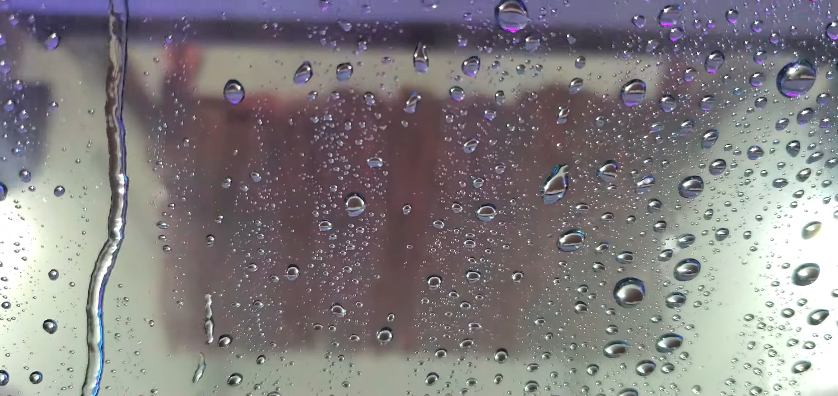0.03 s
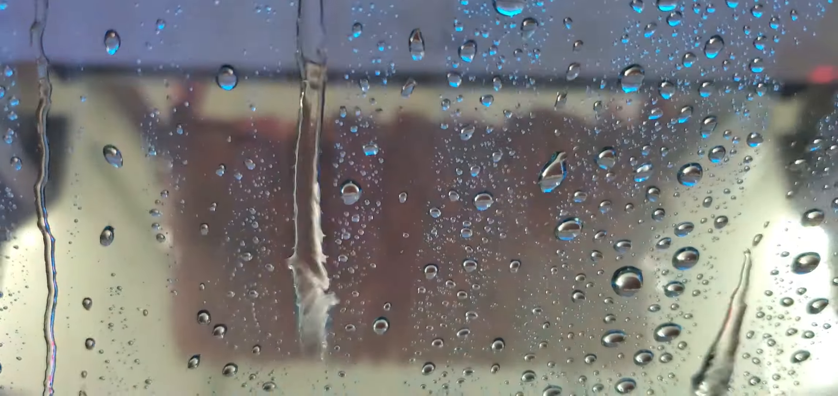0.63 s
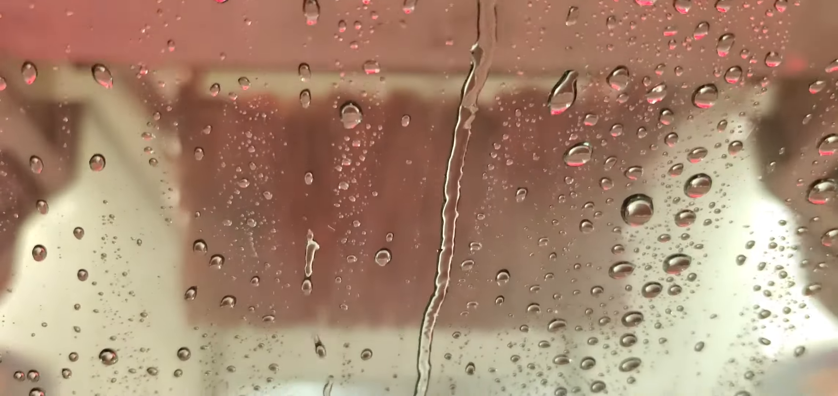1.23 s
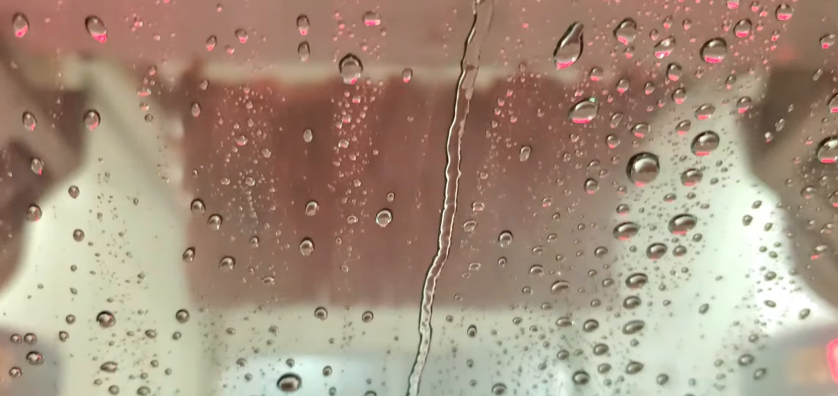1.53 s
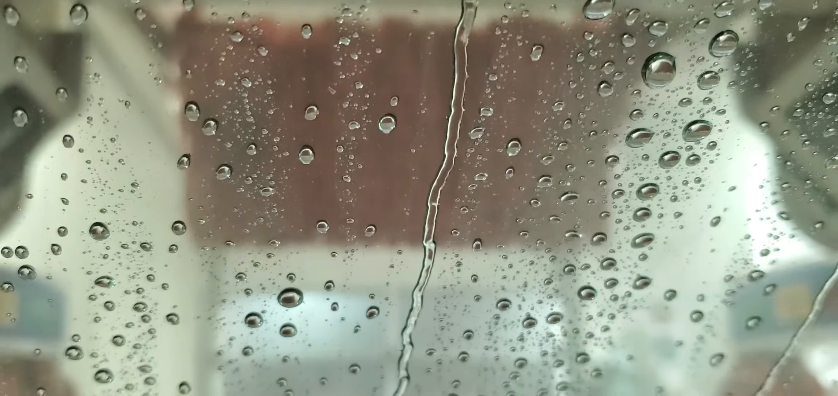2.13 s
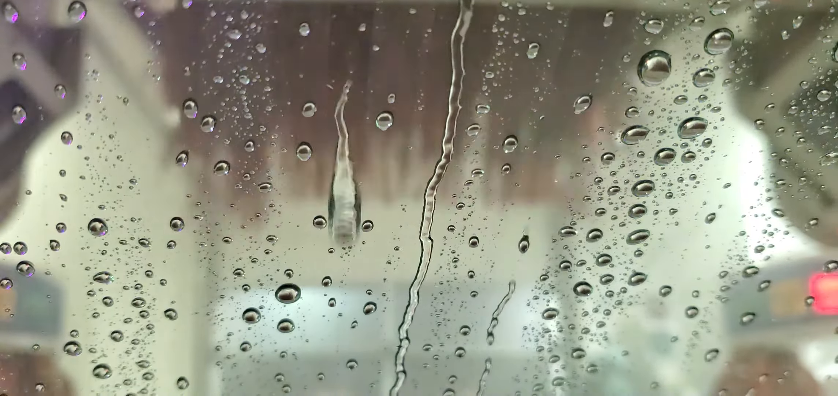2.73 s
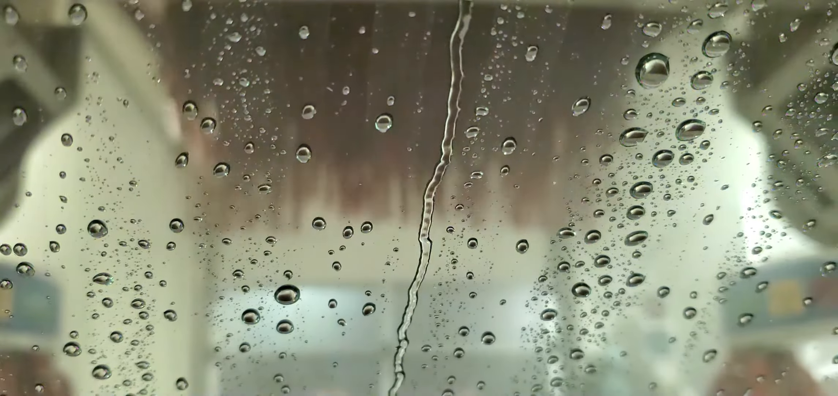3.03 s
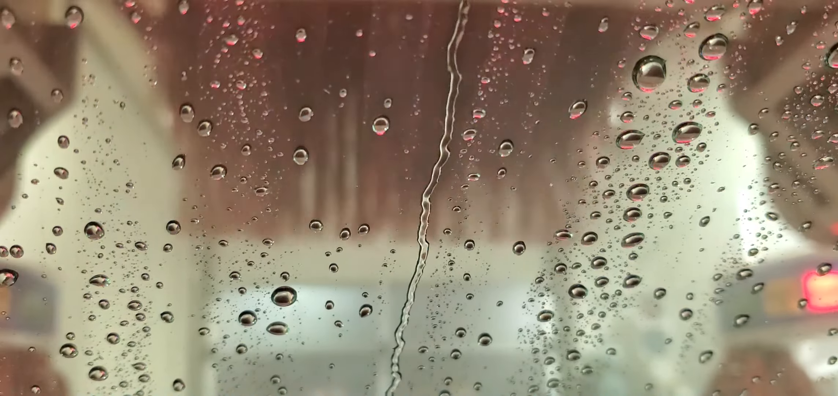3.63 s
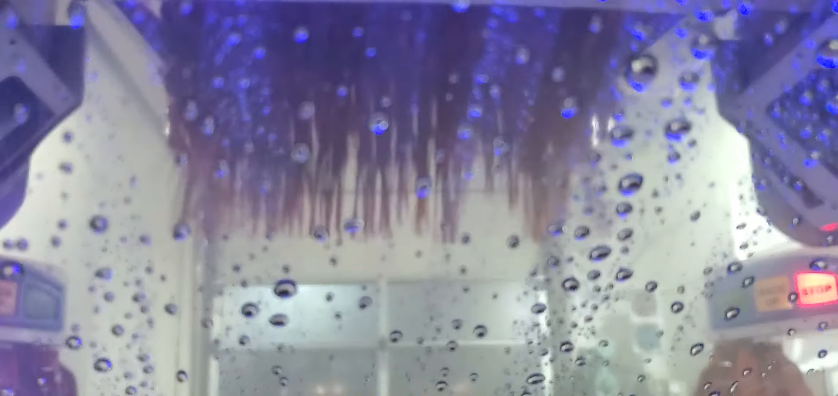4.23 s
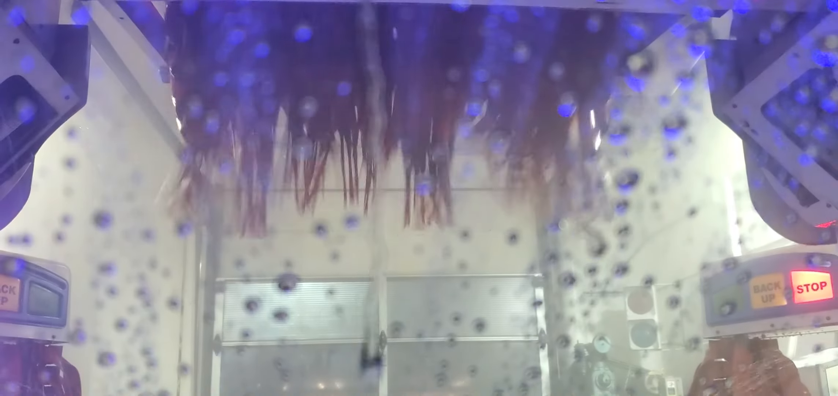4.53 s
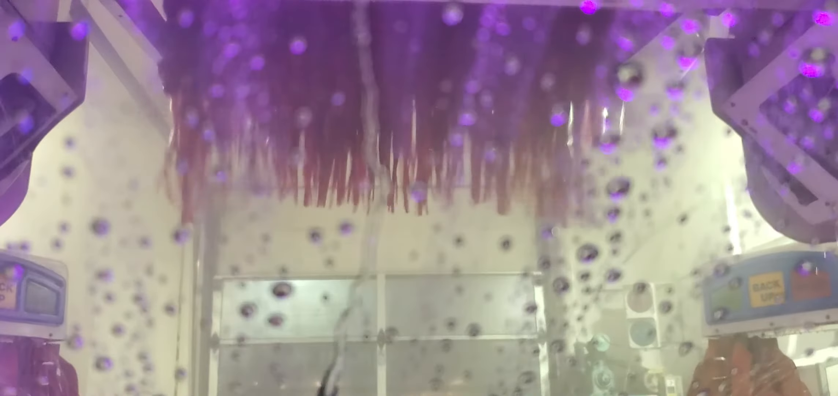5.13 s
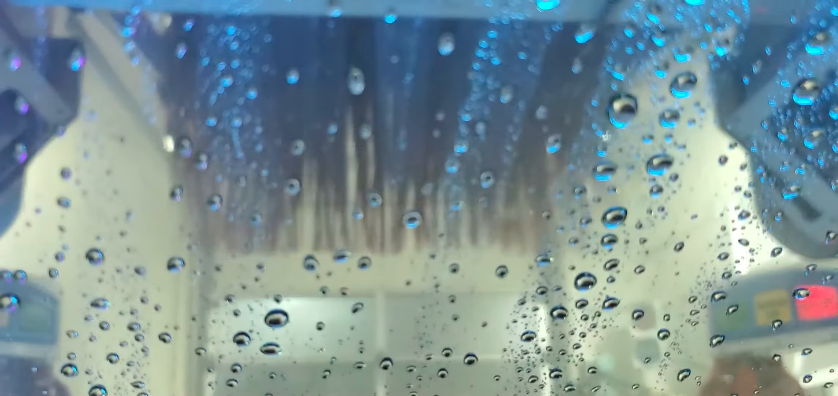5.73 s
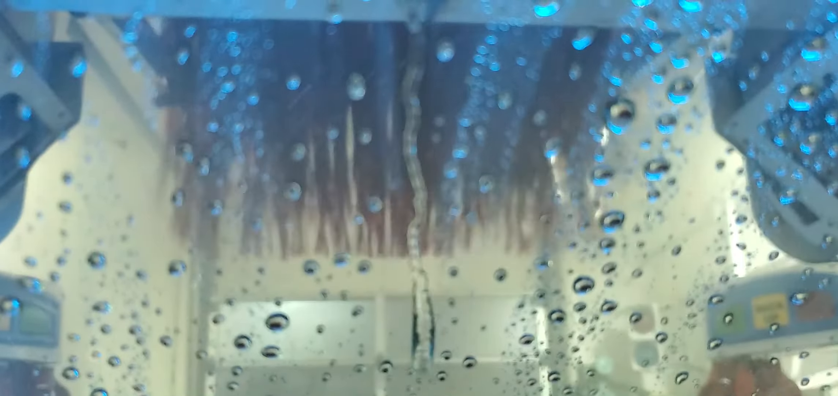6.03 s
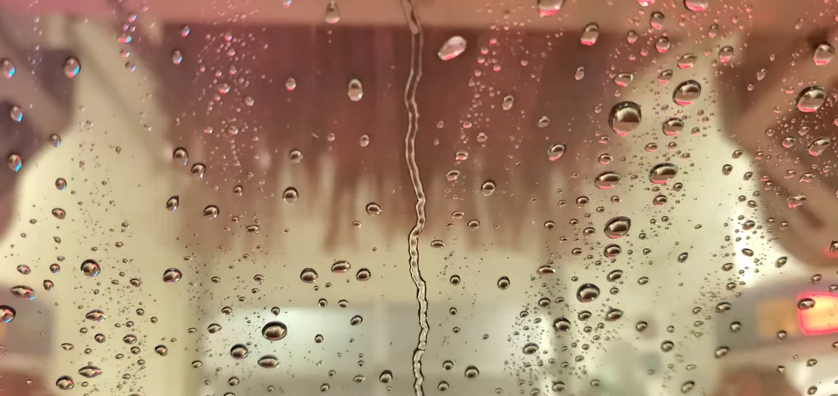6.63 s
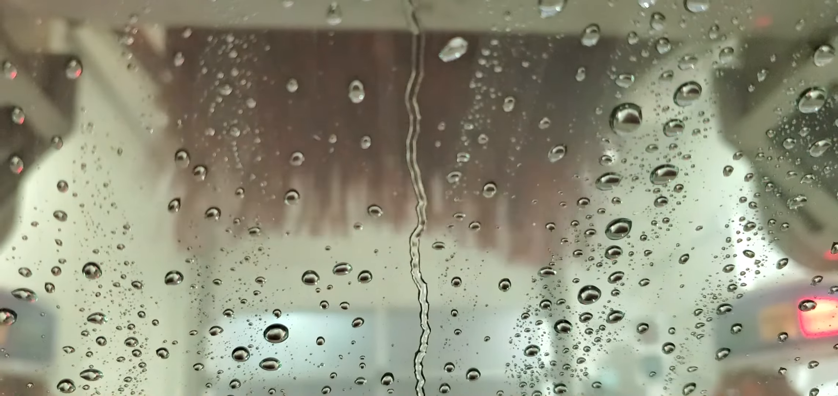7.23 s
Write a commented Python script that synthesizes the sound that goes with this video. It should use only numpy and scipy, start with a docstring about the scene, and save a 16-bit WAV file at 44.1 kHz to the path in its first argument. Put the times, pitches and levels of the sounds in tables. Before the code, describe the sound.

Heard from the front seat, a car wash begins as a soft, dull rumble with a faint whine of motors and small ticks. A sudden shudder and hum mark the dryers starting. Three fans speed up in turn, each with a breathy rising tone, while air beats on the car ever harder. It ends as a loud, steady, muffled roar with a throbbing low boom and two slight hisses of spray.

```python
"""Inside a car at the end of an automatic car wash. Distant machinery rumbles and motor drives whine thinly.
The dryer blowers start with a shudder and an electric hum. As the fans speed up, the tones of their
blades climb one after another, then sink into a roar of air that shakes the car and makes the cabin boom.
Spray hisses on the glass and a few small things click."""
import sys
import numpy as np
from scipy import signal
from scipy.fft import rfft, irfft, next_fast_len
from scipy.io import wavfile
from scipy.ndimage import uniform_filter1d, map_coordinates

SR = 44100
rng = np.random.default_rng(int(sys.argv[2]) if len(sys.argv) > 2 else 0)


def file_out(sig):
    """Save sig as 16-bit WAV at sys.argv[1]."""
    # one column per channel
    cols = np.atleast_2d(sig).T
    # limit, then scale
    lim = np.clip(cols, -1, 1)
    pcm = np.round(lim * 32767).astype(np.int16)
    wavfile.write(sys.argv[1], SR, pcm)


N = 321489

# Levels in a table are relative: they compare its rows with each other.
# How much the ears differ, against what they share: f/Hz, level/dB
STEREO_WIDTH = [(60, -31.5), (110, -17.5), (200, -10.5), (380, -5), (700, -1.5), (1290, 3.5), (2400, -1.5),
                (8000, 2.6), (15000, -1)]
# How much louder the left ear is than the right: f/Hz, level/dB
LEFT_LEAN = [(60, 0.6), (200, 1.8), (400, -0.5), (1200, 1.5), (2400, 4.5), (4400, 1.5), (8000, 2),
             (15000, 1.5)]
# Tone colour (strength at each pitch) of the distant rumble and washing: f/Hz, level/dB
RUMBLE_COLOUR = [(8, -38), (30, -8.5), (54, 1), (76, -3.5), (92, -6.5), (122, 0.5), (148, -7), (172, -4),
                 (205, -9), (250, -20), (800, -120)]
WASH_COLOUR = [(60, -45), (230, -3.5), (290, 2), (400, -2), (520, -1.5), (580, -5.5), (980, -9.5),
               (1100, -11.5), (1800, -13), (2080, -11.5), (2400, -17), (3600, -18.5), (3980, -18),
               (4700, -21), (7900, -21), (9000, -28), (12600, -27.5), (15700, -32.5)]
# Tones of the motor drives: f/Hz, level/dB
DRIVE_TONES = [(6115.7, -63), (6739.6, -68), (7968, -78), (10195, -96), (12263, -104), (13706, -91.5)]
# Small clicks and knocks: t/s, level/dB, f/Hz, width/octaves, fade/s (time to fall by 60 dB)
CLICKS = [(0.074, -50, 2600, 0.4, 0.075), (.179, -48, 3580, .2, 0.051), (.275, -55, 3600, .15, 0.089),
          (0.624, -49, 2500, .6, 0.045), (1.495, -50, 2340, 0.52, 0.052), (1.535, -51, 2320, .3, 0.065),
          (1.575, -49, 2040, 0.23, .06), (2.21, -52, 2070, 0.18, 0.051), (2.318, -52, 6770, .25, .05),
          (2.561, -48.5, 1450, 1.1, 0.32), (2.774, -52, 6230, 0.39, 0.046), (2.928, -44, 2230, 0.09, 0.057),
          (3.197, -37.5, 1820, 0.82, 0.033), (3.661, -32, 1550, 1.25, 0.062), (3.669, -34, 1820, 0.64, 0.1)]
# Bursts of spray: t/s, level/dB, hold/s
SPRAY_BURSTS = [(5.11, -53.5, 0.16), (6.692, -57, .22)]
# Colour of the spray's hiss: f/Hz, level/dB
SPRAY_COLOUR = [(800, -47.5), (2500, -4), (5000, 1.5), (7500, -1.5), (10000, -13), (15500, -12)]
# Hum at multiples of the mains frequency: f/Hz, level/dB
HUM_TONES = [(120.2, -18.5), (240.4, -29), (360.6, -0.5), (721.2, -33.5)]
# Colour of the shaking as the first motor starts: f/Hz, level/dB
SHUDDER_COLOUR = [(20, -22), (45, -10), (70, -3), (110, -2.5), (150, -5), (260, -7.5), (330, -3.5),
                  (450, -15), (680, -18.5), (900, -39), (3000, -120)]
# Fans speeding up: t/s, first f/Hz, top f/Hz, level/dB, attack/s, hold/s, blur/Hz, roughness (0-1)
FANS = [(2.2, 238, 1165, 1, 0.11, 3.8, 55.05, 0.52), (3.039, 97.2, 440, -3, 0.078, 1.37, 44.89, 0.43),
        (5.35, 276.5, 448.4, -1.5, 0.24, 0.57, 30.26, 0.02)]
# Resonances (pitches that pass easily) on the way into the car: f/Hz, width/Hz, level/dB
PASSAGE_RESONANCES = [(119, 46, -23), (160, 37, -28.5), (282, 28, -30.5), (321.2, 27.6, -20),
                      (372, 26, -32.5), (431, 40, -25.5), (519, 39, -28.5), (627, 140, -44.5),
                      (865, 60, -43.5), (1050, 300, -53.5)]
# Colour of the stalled air behind the second fan: f/Hz, level/dB
WAKE_COLOUR = [(20, -44.5), (50, -23), (85, -6), (120, -0.5), (170, -8.5), (220, -10.5), (260, 1.5),
               (310, -23.5), (420, -22), (1500, -120)]
# Pitches at which the cabin rings: f/Hz, width/Hz, level/dB
CABIN_RESONANCES = [(55.6, 9.7, -6), (85.2, 11.6, -6.5), (113.8, 10.2, -3), (132, 8.5, -2),
                    (154.4, 19, -10), (196, 22.5, -7.5)]
# How the cabin's main boom swells and dips: t/s, level/dB
BOOM_LEVELS = [(4.6, -36), (5.17, -25), (5.22, -17.5), (5.76, -26), (5.86, -21), (6.13, -10), (6.24, -22.5),
               (6.36, -12.5), (6.47, -21.5), (6.65, -10), (6.74, -25.5), (7.2, -20.5)]
# Colour of the air's low roar and higher rush: f/Hz, level/dB
ROAR_COLOUR = [(60, -58.5), (170, -28.5), (230, -18), (260, 5.5), (320, 2), (380, -0.5), (440, -1.5),
               (490, -4.5), (560, -12), (640, -10.5), (760, -12.5), (870, -14.5), (980, -26.5), (1400, -42),
               (3000, -120)]
RUSH_COLOUR = [(300, -52.5), (900, -2), (1100, 0), (1700, -2.5), (2200, -5.5), (3200, -11), (4400, -19.5),
               (5400, -24.5), (8000, -29.5), (9000, -30.5), (11300, -35), (12200, -27.5), (13700, -32),
               (14900, -29.5), (15700, -28)]

SWITCH_ON_S = 2.171  # the first motor gets its current
CLIMB_HZ_PER_S, FAN_FADE_DB_PER_S = 257, 69.5  # the same for every fan


def amp(db):
    """Turn decibels into a number to multiply a sound by."""
    return 10 ** (np.asarray(db) / 20)


def unit(x):
    """Scale a signal to an average strength (rms) of 1."""
    return x / np.sqrt(np.mean(np.abs(x) ** 2) + 1e-20)


def along(table, hz):
    """Read between the rows of a frequency table, on a log scale."""
    freqs, values = np.transpose(table)
    return np.interp(np.log(hz + 1), np.log(freqs + 1), values)


def envelope(start, attack, hold, fade_db_per_s):
    """A gain that rises smoothly to 1, holds, then dies away."""
    t = np.arange(N) / SR - start
    rise = np.sin(np.pi / 2 * np.clip(t / attack, 0, 1)) ** 2
    return rise * amp(-fade_db_per_s * np.maximum(t - attack - hold, 0))


def ramp(start, end):
    """A steady rise from 0 to 1 between two times."""
    return np.clip((np.arange(N) / SR - start) / (end - start), 0, 1)


def swell(peak_s, width_s):
    """A smooth rise to 1 and back, shaped like a bell."""
    return np.exp(-((np.arange(N) / SR - peak_s) / width_s) ** 2)


def climb(start, first_hz, top_hz, hz_per_s):
    """A pitch that rises steadily up to its top."""
    return np.minimum(first_hz + hz_per_s * np.maximum(np.arange(N) / SR - start, 0), top_hz)


def wobble(rate):
    """A smooth curve of strength 1 through `rate` random points a second."""
    points = rng.standard_normal(int(N * rate / SR) + 4)
    return unit(map_coordinates(points, [np.arange(N) * rate / SR]))


def filtered(x, response):
    """Turn each frequency of x up or down by response(hz)."""
    size = next_fast_len(N + SR // 2)
    return irfft(rfft(x, size) * response(np.fft.rfftfreq(size, 1 / SR)), size)[..., :N]


def in_cabin(pair):
    """Mix two unrelated signals into stereo: bass alike at both ears, treble all around."""
    def spread(hz):
        width = amp(along(STEREO_WIDTH, hz))
        return np.array([np.ones_like(hz), width]) / np.hypot(1, width)

    mid, side = filtered(pair, spread)
    ears = np.array([mid + side, mid - side])
    return unit(filtered(ears, lambda hz: amp(along(LEFT_LEAN, hz) * np.array([[.5], [-.5]]))))


def noise(colour, patchy_db):
    """Swirling stereo noise of strength 1, with drifting louder and softer patches."""
    spectra = signal.stft(rng.standard_normal((2, N)), nperseg=512)[2]
    patches = uniform_filter1d(rng.standard_normal(spectra.shape[1:]), size=6, axis=0)  # smooth in pitch
    patches = uniform_filter1d(patches, size=14, axis=1)  # and in time
    pair = signal.istft(spectra * amp(patchy_db * unit(patches)), nperseg=512)[1][:, :N]
    return in_cabin(filtered(pair, lambda hz: amp(along(colour, hz))))


def fuzzy_tone(hz, blur_hz, rough):
    """A stereo tone of strength 1; swirling air smears the share `rough` of it into nearby pitches."""
    flutter = np.array([unit(wobble(blur_hz) + 1j * wobble(blur_hz)) for ear in range(2)])
    pure = np.exp(2j * np.pi * np.cumsum(hz * np.ones(N)) / SR)
    return in_cabin(np.real(pure * (np.sqrt(1 - rough) + np.sqrt(rough) * flutter)))


def far_machinery():
    """Brushes and water further back, dulled by the closed car: the rumble nears, the washing drops away."""
    travel = ramp(0, SWITCH_ON_S)
    rumble_db = -48.5 + 1.5 * travel + 5.5 * swell(peak_s=1.66, width_s=0.19)
    rumble = amp(rumble_db + .6 * wobble(6.6)) * noise(RUMBLE_COLOUR, patchy_db=0)
    wash = amp(-49 - 2.5 * travel + .4 * wobble(6.2)) * noise(WASH_COLOUR, patchy_db=0.84)
    return rumble + wash


def whistle():
    """A faint, breathy whistle from the distant machinery."""
    return amp(-71.5 + wobble(4)) * fuzzy_tone(3980, blur_hz=160, rough=.95)


def drive_whine():
    """Motor drives whine as they switch current. The car passes the loudest and slowly leaves them all."""
    t = np.arange(N) / SR
    sides = np.array([[1], [-1]])  # the drives stand to the left: louder and earlier there
    distance_db = 6 - 0.1 * t
    tones = 0
    for k, (hz, db) in enumerate(DRIVE_TONES):
        drift_db = 4 * swell(peak_s=1.53, width_s=0.79) if k == 0 else 1.1 * wobble(2)
        phase = 2 * np.pi * hz * t + .08 * wobble(10) + 0.28 * sides
        tones += amp(db + drift_db + distance_db + .4 * wobble(6) + 1.4 * sides) * np.sin(phase)
    return tones


def clicks():
    """Small things touch: each gives a quickly fading burst around its own pitch, a little to the left."""
    size = SR // 4
    t, hz = np.arange(size) / SR, np.fft.rfftfreq(size, 1 / SR) + 1
    out = np.zeros((2, N + size))
    for start, db, centre_hz, octaves, fade_s in CLICKS:
        band = 1 / (1 + (np.log2(hz / centre_hz) / octaves) ** 2) ** 2.1 / (1 + (hz / 10000) ** 6)
        burst = unit(irfft(rfft(rng.standard_normal((2, size))) * band, size))
        rise = 1 - np.exp(-t / 0.00089)
        out[:, round(start * SR):][:, :size] += burst * rise * amp(db - 60 * t / fade_s)
    return out[:, :N] * amp([[2], [-.5]])


def spray():
    """Fine water blown across the glass: each burst arrives at once and thins out."""
    bursts = sum(amp(db) * envelope(start, attack=.03, hold=hold, fade_db_per_s=41)
                 for start, db, hold in SPRAY_BURSTS)
    return bursts * amp(1.2 * wobble(40)) * noise(SPRAY_COLOUR, patchy_db=0.5)


def motor_hum():
    """The motor's coils hum at multiples of the mains frequency while they draw starting current."""
    t = np.arange(N) / SR
    tones = sum(amp(db + 0.77 * wobble(5)) * np.sin(2 * np.pi * hz * t + 0.31 * wobble(12))
                for hz, db in HUM_TONES)
    current = envelope(SWITCH_ON_S, attack=0.29, hold=2.22, fade_db_per_s=13)
    return amp(-30.5) * current * tones * amp([[.5], [-.5]])


def shudder():
    """Switched on, the first motor pulses at the mains rate and shakes its frame and the car."""
    pulsing = amp(-2.5) * fuzzy_tone(60, blur_hz=25, rough=0.17)
    frame = amp(-3.5) * fuzzy_tone(108, blur_hz=34.94, rough=0.24)
    shaking = amp(-3.5) * noise(SHUDDER_COLOUR, patchy_db=4)
    jolt = envelope(SWITCH_ON_S, attack=0.057, hold=0.23, fade_db_per_s=97)
    late_bass = envelope(start=2.2, attack=0.06, hold=0.074, fade_db_per_s=84) * (pulsing + frame)
    return amp(-25.5) * (jolt * shaking + late_bass)


def blade_tones():
    """Each fan's tone climbs as it speeds up, and gets louder at every resonance it crosses."""
    tones = 0
    for start, first_hz, top_hz, db, attack, hold, blur_hz, rough in FANS:
        hz = climb(start, first_hz, top_hz, CLIMB_HZ_PER_S)
        passage = sum(amp(peak_db) / (1 + (2 * (hz - centre) / width) ** 2)
                      for centre, width, peak_db in PASSAGE_RESONANCES)
        gain = amp(db) * passage * envelope(start, attack, hold, FAN_FADE_DB_PER_S)
        tones += gain * fuzzy_tone(hz, blur_hz, rough)
    return tones


def howl():
    """Working hard, the first fan adds a higher, breathy tone and two smeared overtones, all unsteady."""
    start, first_hz, top_hz = FANS[0][:3]
    hz = climb(start, first_hz, top_hz, CLIMB_HZ_PER_S)
    upper = fuzzy_tone(climb(start, first_hz=536, top_hz=866, hz_per_s=315), blur_hz=89.9, rough=.9)
    upper *= amp(-39) * envelope(start, attack=0.15, hold=.04, fade_db_per_s=15.5)
    second = fuzzy_tone(2 * hz, blur_hz=220, rough=1)
    second *= amp(-48) * envelope(start, attack=0.31, hold=0.38, fade_db_per_s=91)
    third = fuzzy_tone(3 * hz, blur_hz=260, rough=1)
    third *= amp(-53.5) * envelope(start, attack=.25, hold=.27, fade_db_per_s=152.5)
    return amp(2.2 * wobble(8.4)) * (upper + second + third)


def tunnel(pair, fade_s, echo_share):
    """The hard tunnel echoes a rising tone, leaving a trail of lower pitches that throb against it."""
    t = np.arange(SR) / SR
    tails = rng.standard_normal((2, SR)) * amp(-60 * t / fade_s) * (t > .02)
    echo = in_cabin(signal.fftconvolve(pair, tails, axes=1)[:, :N]) * pair.std()
    return np.sqrt(1 - echo_share) * pair + np.sqrt(echo_share) * echo


def blowers():
    """Three fans speed up in turn and ring through the tunnel; stalled air builds up behind the second."""
    build_up = envelope(start=2.84, attack=1.79, hold=.1, fade_db_per_s=7.5)
    wake = amp(-29) * build_up * noise(WAKE_COLOUR, patchy_db=-1)
    return tunnel(blade_tones() + howl(), fade_s=2, echo_share=0.36) + wake


def cabin_response(hz):
    """The cabin rings at a few low pitches and passes little treble or very deep bass."""
    ringing = sum((-1) ** k * amp(db) * 1j * hz * width / (centre ** 2 - hz ** 2 + 1j * hz * width)
                  for k, (centre, width, db) in enumerate(CABIN_RESONANCES))
    return ringing / (1 + (hz / 380) ** 4) * hz / np.hypot(hz, 35)


def cabin_boom():
    """The air in the cabin booms at its main resonance, swelling and dipping."""
    times, levels = np.transpose(BOOM_LEVELS)
    db = np.interp(np.arange(N) / SR, times, levels)
    build_up = ramp(times[0] - 1, times[0]) ** 2
    return amp(db - 2.7) * build_up * fuzzy_tone(85, blur_hz=14, rough=0.04)


def air_jets():
    """Jets of air beat on the car so that it booms; they roar and rush louder as the air speeds up."""
    start_s, opening_s, full_speed_s = 2.49, 0.78, 5.23
    shortfall = 1 - ramp(start_s, full_speed_s)  # 1 at rest, 0 at full speed
    body = in_cabin(filtered(rng.standard_normal((2, N)), cabin_response))
    beating = amp(-21 - 34.5 * shortfall) * body
    boom = cabin_boom()
    roar = amp(-24 - 27.5 * shortfall + 0.76 * wobble(9.8)) * noise(ROAR_COLOUR, patchy_db=1)
    rush = amp(-41.5 - 29.5 * shortfall + 0.23 * wobble(9)) * noise(RUSH_COLOUR, patchy_db=0.96)
    return ramp(start_s, start_s + opening_s) ** 2 * (beating + boom + roar + rush)


def scene():
    """Everything as heard from the front seat."""
    background = far_machinery() + whistle() + drive_whine()
    dryers = motor_hum() + shudder() + blowers() + air_jets()
    return background + dryers + spray() + clicks()


def record(dry):
    """Fade both ends very briefly and cut off the highest treble."""
    return filtered(dry * signal.windows.tukey(N, .001), lambda hz: hz < 15750)


dry = scene()
out = record(dry)
file_out(out)
```